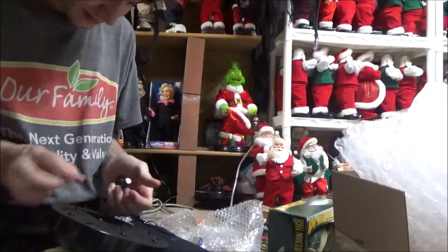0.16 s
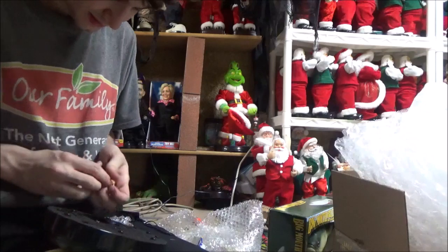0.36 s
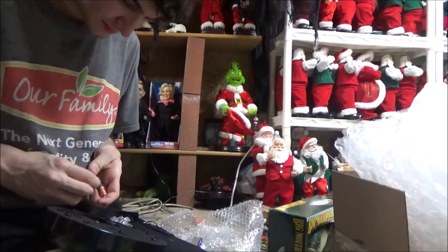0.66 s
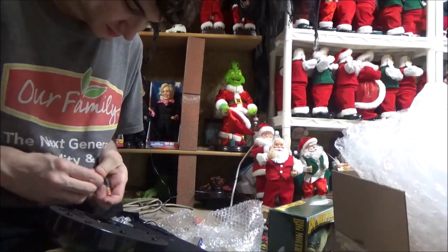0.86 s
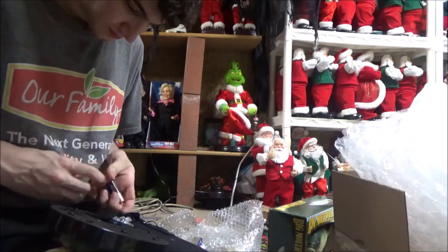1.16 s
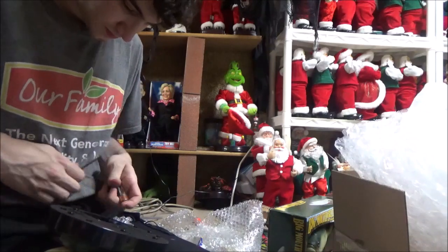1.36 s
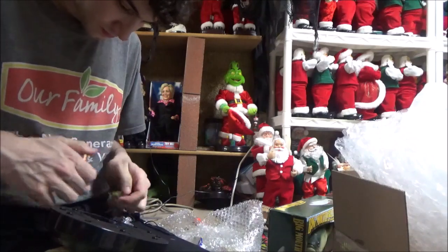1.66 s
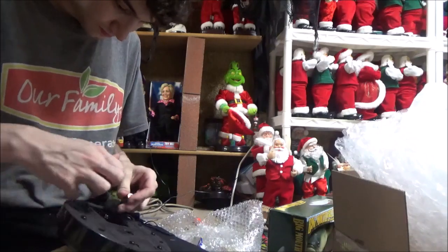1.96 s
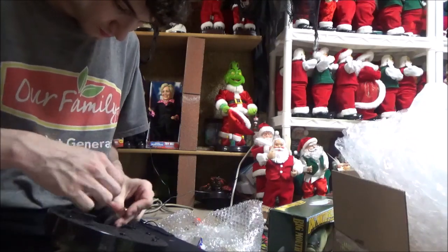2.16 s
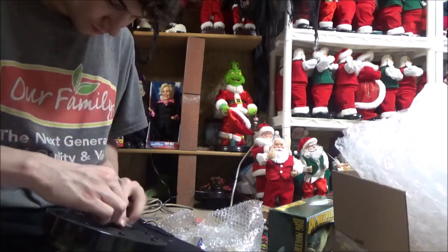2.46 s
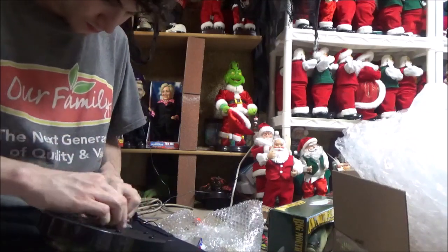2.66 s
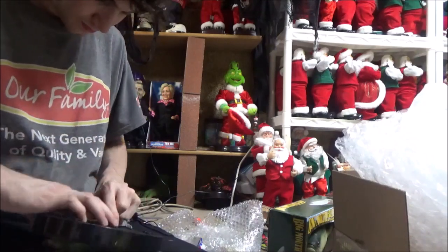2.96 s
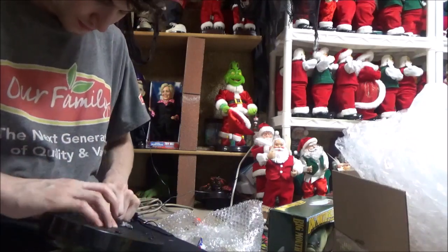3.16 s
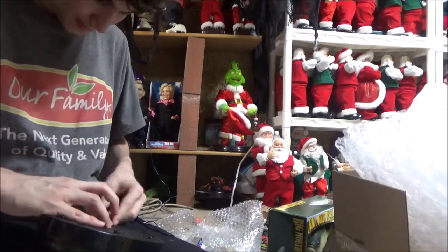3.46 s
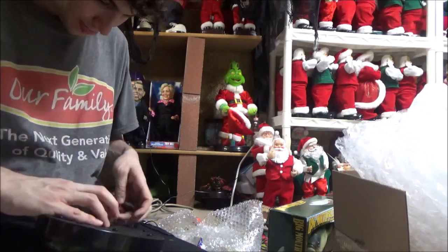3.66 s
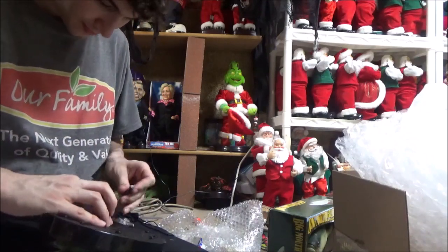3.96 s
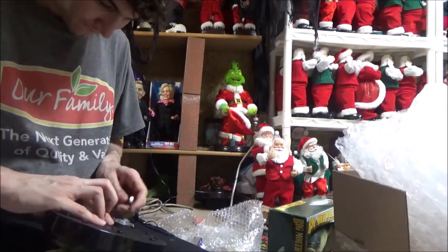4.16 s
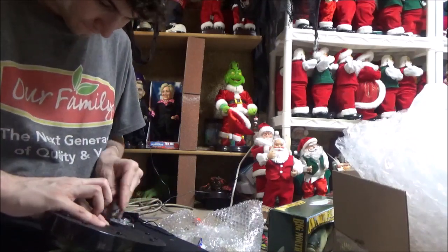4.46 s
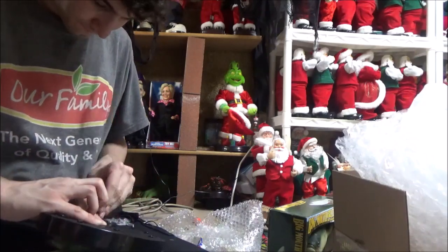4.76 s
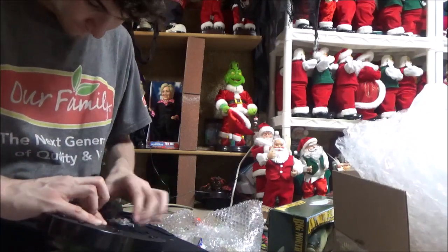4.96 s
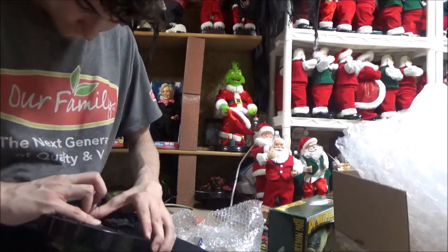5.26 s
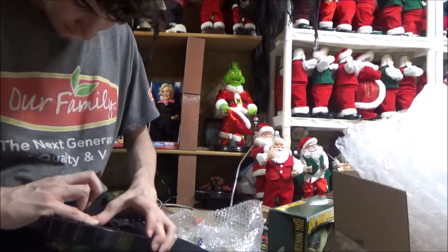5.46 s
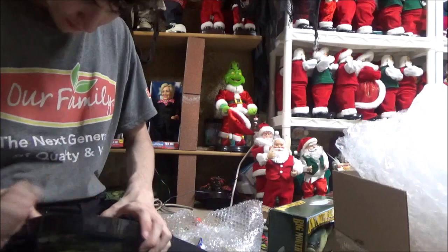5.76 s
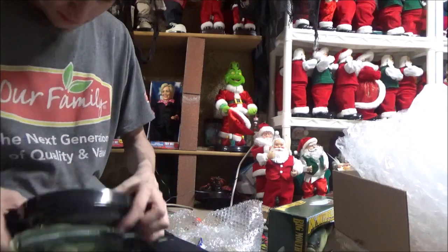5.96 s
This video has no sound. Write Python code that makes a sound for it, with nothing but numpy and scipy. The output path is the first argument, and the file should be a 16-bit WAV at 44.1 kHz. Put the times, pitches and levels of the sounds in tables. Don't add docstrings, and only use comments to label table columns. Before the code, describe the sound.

Batteries clink in a hand, then snap and clack into a hollow plastic toy base, with scrapes and rubbing, close up in a quiet room.

```python
import sys
import numpy as np
from scipy import signal
from scipy.fft import rfft, irfft, next_fast_len
from scipy.io import wavfile
from scipy.ndimage import uniform_filter1d

SR = 44100
rng = np.random.default_rng(int(sys.argv[2]) if len(sys.argv) > 2 else 0)


def put_to_file(sound):
    columns = np.atleast_2d(sound).T
    safe = np.clip(columns, -1, 1)
    whole_steps = np.round(safe * 32767)
    wavfile.write(sys.argv[1], SR, whole_steps.astype(np.int16))


def volts_from_decibels(level):
    exponent = np.asarray(level, float) / 20
    return 10 ** exponent


N = 269892

# (frequency [Hz], level [dB], decay t60 [s])
SHELL_MODES = [(260, -18, .05), (352, 2, .08), (452, -6, .055), (530, 3, .08), (678, -2, .055),
               (777, 3, .065), (935, 3, .06), (1040, -3, .05), (1284, -4, .045)]
# (frequency [Hz], level [dB], decay t60 [s])
BAY_MODES = [(978, -5, .05), (1110, -1, .055), (1380, -1, .045), (1640, -6, .035), (1712, -2, .045),
             (1787, -2, .045), (1980, -6, .03), (2210, -6, .03), (2275, -7, .03), (2750, -7, .02),
             (3300, -10, .012)]
MODES = SHELL_MODES + BAY_MODES


def evened(x):
    return x / np.sqrt(np.mean(x ** 2) + 1e-20)


def read(points, hz):
    f, value = np.transpose(points)
    return np.interp(np.log(hz + 1), np.log(f + 1), value)


def add(mix, s, sound):
    part = mix[round(s * SR):][:len(sound)]
    part += sound[:len(part)]


def coloured(x, points):
    size = next_fast_len(len(x))
    gain = volts_from_decibels(read(points, np.fft.rfftfreq(size, 1 / SR)))
    return irfft(rfft(x, size) * gain, size)[:len(x)]


def causal(points, size):
    log_gain = np.log(volts_from_decibels(read(points, abs(np.fft.fftfreq(size, 1 / SR)))))
    return np.fft.ifft(np.exp(np.conj(signal.hilbert(log_gain)))).real


def background():
    # (frequency [Hz], level [dB])
    floor_spectrum = [(12, -47), (20, -37), (64, 1.5), (81, -7), (239, -13.5), (406, -15.5), (528, -14),
                      (1140, -15.5), (1260, -19), (1560, -18), (7210, -28), (10200, -26.5), (11000, -33.5),
                      (14300, -78), (22000, -120)]
    # (frequency [Hz], correlation [-1 to 1])
    likeness = [(60, 0.89), (130, 0.93), (270, 0.54), (570, 0.072), (1200, -0.13), (2540, 0.28),
                (5360, 0.43), (11300, 0.8)]
    # (frequency [Hz], rms level [dB])
    hum_lines = [(59.3, -67)]
    frames, hz = N // 256 + 5, np.fft.rfftfreq(1024, 1 / SR)
    a, b, c, d, patches = rng.standard_normal((frames, 513, 5)).T
    patches = uniform_filter1d(patches, size=16, axis=0)
    patches = evened(uniform_filter1d(patches, size=14, axis=1))
    same = np.clip(read(likeness, hz), -1, 1)[:, None]
    left = a + 1j * b
    right = same * left + np.sqrt(1 - same ** 2) * (c + 1j * d)
    z = np.array([left, right]) * volts_from_decibels(read(floor_spectrum, hz)[:, None] + .6 * patches)
    air = volts_from_decibels(-62) * evened(signal.istft(z, nperseg=1024, noverlap=768)[1][:, :N])
    t = np.arange(N) / SR
    waver = evened(uniform_filter1d(rng.standard_normal((2, N)), size=6000, axis=1))
    hum = 0
    for f, db in hum_lines:
        level = volts_from_decibels(db + 0.71 * waver[0]) * np.sqrt(2)
        hum = hum + level * np.sin(2 * np.pi * f * t + 0.12 * waver[1])
    return air + hum


def room(x):
    # (frequency [Hz], t60 [s])
    reverb_time = [(250, .1), (700, .1), (2000, .1), (5000, .09), (10000, .075)]
    # (frequency [Hz], level [dB])
    tail_tone = [(300, -2.5), (500, -3), (750, -5), (1100, 0), (1750, -4.5), (2400, -1), (3100, -3),
                 (9000, -2.5)]
    # (frequency [Hz], level [dB])
    unrelated = [(300, -85), (1500, -14), (4000, 2), (10000, 1)]
    late_db, late_stretch = -18, 1.8
    taps = np.zeros((2, SR // 4))
    at = np.arange(100, SR // 4 - 20, 20)
    at = at + rng.integers(0, 20, (2, len(at)))
    np.put_along_axis(taps, at, rng.choice([-1., 1.], at.shape), 1)
    taps = taps[0] + np.outer([1, -1], coloured(taps[1], unrelated))
    taps = np.array([coloured(side, tail_tone) for side in taps])
    hz, t, z = signal.stft(taps, SR, nperseg=128)
    fall_db = -60 * t / read(reverb_time, hz)[:, None]
    decay = volts_from_decibels(fall_db) + volts_from_decibels(late_db + fall_db / late_stretch)
    tail = signal.istft(z * decay, SR, nperseg=128)[1]
    return signal.oaconvolve(x[None], tail / np.linalg.norm(tail[0]), axes=1)[:, :N]


def echoed(x):
    # (delay [s], level [dB])
    reflections = [
        (.0075, -19),
        (.0098, -21),
        (.0113, -30),
        (.0175, -33),
        (.024, -32),
    ]
    near = x.copy()
    for delay, db in reflections:
        add(near, delay, volts_from_decibels(db) * x)
    return near


def ports(pair):
    # (frequency [Hz], left-right level [dB])
    port_shade = [(60, -23.5), (170, 0), (490, 1), (1390, 0), (3970, 1.5), (11300, 3.5)]
    # (frequency [Hz], phase [rad])
    port_lead = [(50, 0), (250, -.5), (600, -.85), (1400, -.85), (3000, -.5), (4500, -.15), (11000, -.15)]
    size = next_fast_len(N)
    hz = np.fft.rfftfreq(size, 1 / SR)
    tilt = np.sqrt(volts_from_decibels(read(port_shade, hz)) * np.exp(1j * read(port_lead, hz)))
    return irfft(rfft(pair, size) * [tilt, 1 / tilt], size)[:, :N]


def table_resonance(x):
    # (frequency [Hz], gain at resonance [dB], decay t60 [s])
    table_modes = [(462, -3, .1), (532, -2, .085)]
    rise_s = .005
    t = np.arange(SR // 5) / SR
    air = 0
    for hz, db, t60 in table_modes:
        unit_gain = 2 * np.log(1000) / (t60 * SR)
        air = air + volts_from_decibels(db - 60 * t / t60) * np.sin(2 * np.pi * hz * t) * unit_gain
    return signal.oaconvolve(x, air * (1 - np.exp(-t / rise_s)))[:N]


def rubbing():
    # (frequency [Hz], level per hertz [dB])
    drag_spectrum = [(120, -45), (200, -20), (338, 4), (500, 3), (620, -6), (760, -1), (904, -6), (1050, 2),
                     (1300, -6.5), (5000, -17), (6500, -49), (11000, -120)]
    # (frequency [Hz], level per hertz [dB])
    cloth_spectrum = [(1470, -2), (2500, 2), (3290, 1), (4950, -6), (8300, 0.5), (10500, 2), (11300, -18),
                      (11500, -24), (15000, -50), (22000, -120)]
    # (peak time [s], pressure [dB], swell [s], fade [s], cloth share [dB])
    strokes = [(0.0, -58, 0.064, 0.13, -1), (.24, -68, 0.21, 0.059, -0.5), (2.528, -54.5, 0.26, 0.28, -8),
               (3.153, -45, 0.008, 0.06, -11.5), (3.52, -67.5, 0.99, 1, -4.5),
               (4.18, -72, 0.081, .3, -13.5), (5.25, -56.5, 0.3, 0.32, -14),
               (5.631, -66.5, 0.021, 0.026, 9.5), (5.776, -59.5, 0.22, 0.072, 7),
               (5.927, -48.5, 0.11, 0.11, 1.5), (6.12, -54.5, 0.18, .05, -2)]
    drop_db = -13.5
    sizes = volts_from_decibels(1.7 * np.minimum(rng.exponential(1, (2, N)), 4))
    grains = sizes * (rng.random((2, N)) < [[2500 / SR], [5000 / SR]])
    slips = evened(grains * rng.standard_normal((2, N)))
    slips = slips + 1.6 * rng.standard_normal((2, N))
    drag, hiss = evened(coloured(slips[0], drag_spectrum)), evened(coloured(slips[1], cloth_spectrum))
    lumps = volts_from_decibels(2.5 * evened(uniform_filter1d(rng.standard_normal((2, N)), size=500, axis=1)))
    drag, hiss = drag * lumps[0], hiss * np.sqrt(lumps[0] * lumps[1])
    t, out = np.arange(N) / SR, np.zeros(N)
    for s, db, swell, fade, cloth_db in strokes:
        away = np.maximum((s - t) / swell, (t - s) / fade)
        pressure = volts_from_decibels(db + drop_db * away) * np.clip(2 - 2 * away, 0, 1)
        out += pressure * (drag + volts_from_decibels(cloth_db) * hiss)
    return out


def moan(s, length, db, hz, width):
    t = np.arange(round(length * SR)) / SR
    r = np.exp(-np.pi * width / SR)
    wander = signal.lfilter([1 - r], [1, -r], rng.standard_normal((2, SR // 5)))[:, -len(t):]
    tone = wander[0] * np.cos(2 * np.pi * hz * t) + wander[1] * np.sin(2 * np.pi * hz * t)
    return s, volts_from_decibels(db) * evened(tone) * np.sin(np.pi * t / length)


def struck_mode(s, db, hz, t60):
    t = np.arange(SR // 5) / SR
    return s, volts_from_decibels(db - 60 * t / t60) * np.sin(2 * np.pi * hz * t) * (1 - np.exp(-t / 0.0004))


def tick(s, db, hz, t60):
    t = np.arange(2000) / SR
    grit = 1 + 1.3 * uniform_filter1d(rng.standard_normal(len(t)), size=6)
    grit = grit * (1 - np.exp(-t / .0002))
    ringing = volts_from_decibels(db - 60 * t / t60) * grit * np.sin(2 * np.pi * hz * t)
    return s, signal.lfilter(*signal.butter(2, 1500, "highpass", fs=SR), ringing)


def colour_of(body_db, shell_db, snap_db, crack_db, tick_db):
    corner_hz = [60, 220, 480, 1000, 2000, 3500, 6500, 9000]
    low = [body_db - 60, body_db - 24, body_db]
    high = [shell_db - 2.5, snap_db - 3.0, crack_db, tick_db - 15.0, tick_db - 12]
    return list(zip(corner_hz, low + high))


def ring(colour, chance, t):
    hz, db, t60 = np.transpose(MODES + MODES)[:, :, None]
    spot, detune, phase = chance[:, :, None]
    hz, spot_db = hz * (1 + .005 * detune), 2.5 * spot
    level = volts_from_decibels(db + spot_db + read(colour, hz) - 60 * t / t60)
    return (level * np.sin(2 * np.pi * hz * t + 0.7 * phase)).sum(0)


def scrape(row, chance, noise):
    s, length, body_db, shell_db, snap_db, tick_db = row
    colour = colour_of(body_db, shell_db, snap_db - 4.5, snap_db + 2.0, tick_db)
    t = np.arange(len(noise)) / SR
    stroke = np.sin(np.pi * np.clip(t / length, 0, 1)) ** .8
    slips = stroke * (noise * (abs(noise) > 2.2) + .15 * noise)
    body = volts_from_decibels(-23.5) * ring(colour, chance, t) + volts_from_decibels(6.5) * causal(colour, size=len(t))
    return s, signal.fftconvolve(slips, body)


def blow(row, chance, noise):
    s, peak_db, body_db, shell_db, snap_db, tick_db = row
    creak_s, creak_db, creak_swell_db = 0.003, 3, 23
    colour = colour_of(body_db, shell_db, snap_db, -9.0, tick_db)
    t = np.arange(len(noise)) / SR
    crackle = coloured(noise, colour)
    click = volts_from_decibels(32.5) * causal(colour, size=len(noise)) + volts_from_decibels(20) * crackle * volts_from_decibels(-60 * t / 0.011)
    clatter = coloured(crackle[::-1], [(800, -1), (1600, -6), (3500, -5.5), (9000, -5.5)])
    clatter = clatter * volts_from_decibels(-60 * t / 0.043)
    shell = volts_from_decibels(-11.5) * ring(colour, chance, t)
    rise = 1 - np.exp(-t / 0.00032)
    before = t[t < creak_s]
    creak = volts_from_decibels(creak_db + creak_swell_db * (before / creak_s - 1.0)) * crackle[-len(before):]
    sound = np.append(creak, rise * (click + shell + volts_from_decibels(12.5) * clatter))
    return s + 0.001162 - creak_s, volts_from_decibels(peak_db) * sound


def contact(weight_db, lean_db, bulge_db, edge_db):
    return weight_db - lean_db, weight_db + bulge_db, weight_db + lean_db, edge_db


def contacts():
    # (time [s], crack peak [dB], weight [dB], lean [dB], edge [dB])
    snaps = [(1.986, -41, -1, 2, -5), (2.3008, -48, 7.5, 5.5, -7), (2.3439, -40.5, 4.5, -1, -1.5),
             (2.389, -42, -8.5, 13, 6), (2.5146, -31.5, 1, 0.5, -4.5), (2.6348, -35, -11.5, -10.5, -11),
             (2.7305, -27.5, 5.5, -0.5, -4.5), (2.7515, -33, 0.5, -6, -8), (2.87, -36, 5, 2.5, -9),
             (2.9155, -18, -10.5, 2, -14), (3.02, -29.5, 5.5, -3.5, 6.5), (3.0699, -44.5, -15, 10, 3),
             (3.1051, -21, -3, 3, 1.5), (3.1439, -16.5, -5.5, 4.5, -8.5), (3.521, -34.5, -2.5, -2, -15),
             (3.608, -45, -5, 3, 0.5), (4.0587, -21.5, -4.5, 2, -7), (4.3085, -19.5, -5, 0, -4.5),
             (4.3929, -18, -5.5, 1.5, -6), (4.9116, -32, -0.5, 7, -6), (4.9333, -28, -20.5, -9, -2),
             (5.1906, -24, -6, 7, -8), (5.2416, -24, -5, 6, -5), (5.332, -20.5, -5, 7.5, 3)]
    # (time [s], crack peak [dB], weight [dB], lean [dB])
    knocks = [(1.692, -69.5, 1, -22.5), (1.989, -47, 10, 4), (2.084, -59, 5, -11), (2.1626, -52, 1, -11),
              (2.3074, -49.5, 15.5, -4.5), (2.4092, -53, 1, -6), (2.4282, -52, -4, -17),
              (2.4773, -61, 6, -4), (2.6074, -43, -9, 1), (2.6495, -61.5, 14.5, -7), (2.788, -52, 3, -8),
              (3.3304, -63, 2, -3), (3.4609, -55, 4, -6), (3.471, -48, 5, -6), (3.4937, -69, -4, 9),
              (3.616, -38, 3, -5), (3.6234, -47.5, 10, -4), (3.8043, -54, 3, -5), (3.8354, -63, 7.5, -4),
              (4.5533, -46, 9, -1), (4.6161, -53, -4, 0), (4.6905, -40, -3, -1), (4.8584, -51, 0.5, -12.5),
              (4.872, -49.5, 0, -11), (2.46, -60.5, 8, -8), (2.489, -59.5, 6.5, -11), (2.57, -59, 8, -1),
              (4.8905, -44.5, 5.5, -11), (5.0326, -52.5, -14, 10), (5.104, -64, 6, 7.5),
              (5.2894, -58, -3, 9)]
    # (time [s], crack peak [dB], weight [dB], edge [dB])
    flicks = [(0.0925, -52, -13, 3.5), (0.1324, -50.5, -1, 13.5), (0.642, -60, -11, 6.5),
              (1.043, -68.5, -9, 14), (1.1164, -68.5, -11, 15), (1.8397, -61, -23, -1),
              (3.0933, -45.5, -2.5, 1), (3.3925, -53.5, -3.5, 4), (3.778, -71, -8, -1),
              (3.9434, -62.5, -5, 8), (4.2165, -61.5, 4, 9), (4.2636, -52.5, -1, 3.5),
              (4.73, -45.5, -7.5, -0.5), (5.4813, -57.5, -3.5, 8), (5.585, -56.5, -6, -3),
              (5.9978, -55, 4, -13), (6.0166, -48, 2, -5), (6.0356, -50, 4, 3), (6.0443, -52, 6, -9)]
    # (time [s], length [s], level [dB], lean [dB], edge [dB])
    scrapes = [(0.118, 0.025, -60, 0.5, 23), (2.251, 0.029, -59.5, 1, 12.5), (2.310, 0.0068, -61, -9, 22),
               (2.349, 0.015, -54.5, -19.5, -15), (2.383, 0.0091, -48.5, 9, 12),
               (2.425, 0.025, -67, -16, -9), (2.588, 0.061, -53.5, 2, 5), (2.744, 0.015, -55, 9, 26.5),
               (2.758, 0.097, -62.5, 16, 21.5), (3.06, 0.018, -51, 9, -15), (3.393, 0.056, -71, 2.5, 29),
               (3.445, 0.031, -59, 5.5, -13), (3.486, 0.065, -55, 5, 12), (3.625, 0.021, -54, -13.5, -25),
               (3.808, 0.042, -58, -8, -7.5), (4.271, 0.13, -54, 1.5, -20), (4.608, 0.029, -65, 7, -3),
               (4.702, 0.02, -65.5, -22.5, -25), (4.855, 0.09, -57.5, -10.5, -16),
               (5.02, 0.047, -65.5, 7, -2.2), (5.097, 0.06, -68, 2, 24), (5.27, 0.035, -53, 11, 14),
               (5.3253, 0.01, -32, 12, 13), (5.336, 0.06, -49, 11, 14)]
    # (time [s], length [s], level [dB], lean [dB], edge [dB])
    slides = [
        (5.614, 0.02, -64, 10, 1),
        (5.684, 0.032, -59, 2, 25),
        (5.734, 0.023, -61, 10, -13),
        (5.879, 0.073, -55.5, 1.5, 20.5),
    ]
    blows = [(s, db, *contact(w, lean, 6.5, edge)) for s, db, w, lean, edge in snaps]
    blows += [(s, db, *contact(w, lean, 3.5, -10.5)) for s, db, w, lean in knocks]
    blows += [(s, db, *contact(w, 3.5, -2, edge)) for s, db, w, edge in flicks]
    drags = []
    for s, length, db, lean, edge in scrapes + slides:
        drags.append((s, length, *contact(db, lean, 2, db + edge)))
    return (blows, blow), (drags, scrape)


def scene():
    # (time [s], level [dB], frequency [Hz], decay t60 [s])
    drums = [(1.695, -55, 500, .11), (2.3465, -22, 530, 0.075), (2.345, -28, 700, .035),
             (3.811, -43, 470, 0.14), (3.842, -46, 950, 0.04), (4.693, -35, 505, 0.09),
             (1.988, -33, 716, 0.05), (1.987, -30, 2110, 0.022), (1.988, -37, 974, .06),
             (1.995, -44, 480, .1), (2.165, -50, 960, .05), (2.088, -52, 700, .05), (2.17, -52, 500, .12),
             (2.302, -27.5, 720, 0.036), (2.308, -35, 960, 0.04), (2.515, -34, 975, .04),
             (2.514, -26, 1350, 0.045), (2.524, -35, 510, .1), (2.732, -22, 780, 0.04),
             (3.021, -19, 792, 0.056), (3.021, -14, 958, 0.042), (3.145, -24, 921, 0.08),
             (3.1445, -16, 1600, .01), (3.144, -29, 795, 0.033), (3.524, -28, 770, 0.05),
             (3.471, -32, 780, .04), (3.608, -40, 2100, .015), (3.645, -40, 520, .05),
             (4.064, -24, 1108, 0.05), (4.310, -24, 941, 0.067), (4.310, -31, 523, 0.062),
             (4.555, -29, 945, 0.065), (4.555, -34, 530, .07)]
    # (time [s], level [dB], frequency [Hz], decay t60 [s])
    more_drums = [(5.1925, -20, 1110, 0.065), (5.243, -22, 1109, 0.07), (5.2422, -12, 2000, .006),
                  (5.243, -28, 960, .045), (5.192, -28, 942, .08), (5.287, -40, 1110, .06),
                  (5.332, -18, 1720, 0.03), (5.3295, -16, 1350, .015), (5.333, -20, 1120, .05),
                  (5.341, -30, 4600, .03), (2.411, -36, 528, 0.073), (2.652, -37, 916, 0.034),
                  (4.912, -41, 2212, 0.045), (4.393, -30, 342, .08), (4.059, -28, 353, .08),
                  (4.059, -18, 769, .06), (4.394, -19, 1390, .04), (4.394, -14, 1500, .006),
                  (4.912, -22, 1900, .007), (2.9163, -9, 1650, .008), (2.9165, -17, 3100, .007),
                  (2.9165, -21, 4200, .007), (2.9163, -22, 980, .03), (2.958, -56, 3600, .1),
                  (2.8705, -18, 950, .012), (2.918, -28, 500, .08), (2.312, -38, 500, .08)]
    # (time [s], level [dB], frequency [Hz], decay t60 [s])
    thumps = [
        (3.058, -47, 190, .05),
        (3.02, -44, 255, .06),
        (.345, -62, 200, .06),
        (5.36, -60, 85, .08),
    ]
    # (time [s], peak [dB], centre frequency [Hz], decay t60 [s])
    clinks = [(.3177, -31, 6200, .007), (.3177, -34, 4900, .007), (.318, -31, 3150, .008),
              (.3225, -35, 3100, .007), (.325, -34, 3500, .008), (.328, -39, 4000, .007),
              (.3225, -42, 6000, .005), (.318, -44, 10200, .008), (.325, -47, 10400, .008),
              (.411, -38, 6300, .006), (.411, -41, 4900, .006), (.4114, -36, 3050, .009),
              (.411, -48, 8500, .005), (.411, -48, 10500, .006), (.418, -48, 3500, .007),
              (.421, -50, 2600, .01), (.325, -44, 2100, .01), (.331, -46, 2900, .012),
              (.333, -48, 4300, .012)]
    # (time [s], peak [dB], centre frequency [Hz], decay t60 [s])
    dry_ticks = [(2.321, -46, 7500, 0.0067), (2.420, -34.5, 10000, 0.0066), (2.853, -49, 4000, .005),
                 (2.961, -41, 8900, 0.0045), (2.984, -50, 2750, 0.012), (3.798, -40, 9400, 0.0078),
                 (4.294, -59, 2000, 0.0086), (4.31, -15, 3230, 0.01), (4.309, -15, 8770, 0.0096),
                 (4.394, -10, 3450, 0.008), (4.693, -35.5, 2540, 0.013), (5.3, -53, 2720, 0.021),
                 (4.881, -37, 2810, .014), (6.018, -35, 8800, .0047), (6.031, -43, 4030, .004),
                 (6.034, -38, 8900, .005), (6.053, -42, 9500, 0.0046)]
    # (time [s], peak [dB], centre frequency [Hz], decay t60 [s])
    judder = [(4.852, -46, 2700, .012), (4.8565, -46, 2750, .012), (4.860, -35, 2350, 0.012),
              (4.865, -36, 2800, 0.011), (4.872, -41, 2550, .012), (4.892, -34, 2500, 0.014),
              (2.31, -36.5, 1800, 0.024), (2.46, -45, 1690, .012), (2.4785, -35, 1800, 0.024),
              (2.4785, -45, 5500, .01), (2.635, -44, 3400, .005), (2.4, -43, 1700, .012),
              (4.935, -36, 7300, 0.0046), (6, -41, 3200, .006), (5.735, -42, 2100, .008),
              (5.999, -43, 2000, 0.011), (6.017, -43, 1900, .008), (6.078, -41.5, 2020, 0.017),
              (6.036, -40, 1600, .008), (6.044, -45, 1500, .008), (4.319, -45, 3800, 0.01),
              (4.406, -38, 2900, 0.01), (5.2, -34, 4500, 0.013), (5.34, -28, 4100, 0.016),
              (4.396, -26, 1800, 0.018)]
    # (time [s], length [s], level [dB], frequency [Hz], width [Hz])
    moans = [
        (5.615, .06, -57, 1110, 60),
        (5.735, 0.018, -55, 1026, 80),
        (5.885, 0.096, -49, 760, 50),
        (5.89, .08, -58, 346, 40),
        (5.975, 0.044, -50.5, 744, 60),
        (6.03, 0.044, -49.5, 465, 50),
        (6.095, 0.034, -57, 395, 60),
        (2.255, 0.04, -59, 966, 80),
    ]
    toy = rubbing()
    for table, sound in contacts():
        chance = rng.standard_normal((len(table), 3, 2 * len(MODES)))
        noise = rng.standard_normal((len(table), 5120))
        for row in zip(table, chance, noise):
            add(toy, *sound(*row))
    for row in drums + more_drums:
        add(toy, *struck_mode(*row))
    toy = signal.sosfilt(signal.butter(4, 270, "highpass", fs=SR, output="sos"), toy)
    for row in thumps:
        add(toy, *struck_mode(*row))
    for row in clinks + dry_ticks + judder:
        add(toy, *tick(*row))
    for row in moans:
        add(toy, *moan(*row))
    toy = toy + table_resonance(toy)
    return ports(echoed(toy) + volts_from_decibels(-8.5) * room(toy)) + background()


def band_limit(x):
    return signal.sosfilt(signal.butter(12, 11940, fs=SR, output="sos"), x)


def record(dry):
    edge = [(11050, 0), (11300, -20), (11900, -34), (13000, -46), (16000, -62), (20000, -90)]  # (Hz, dB)
    return band_limit(np.array([coloured(x, edge) for x in dry]))


dry = scene()
out = record(dry)
put_to_file(out)
```